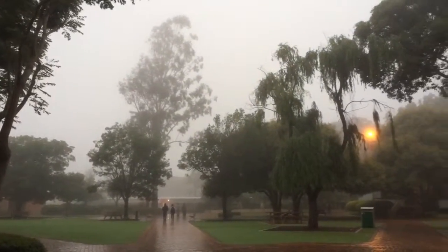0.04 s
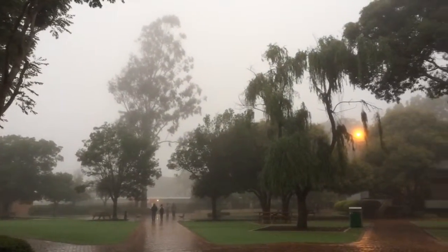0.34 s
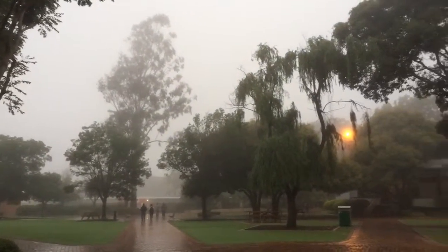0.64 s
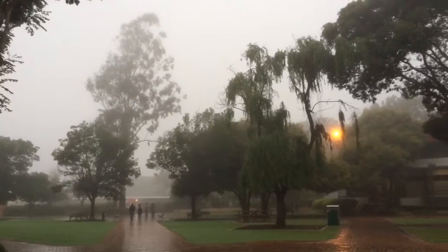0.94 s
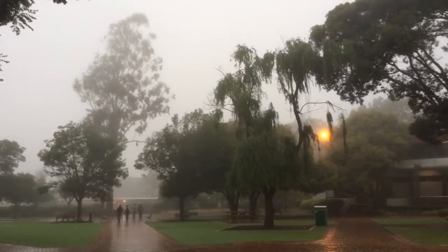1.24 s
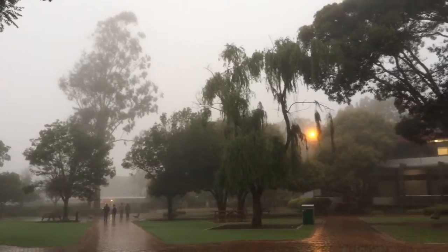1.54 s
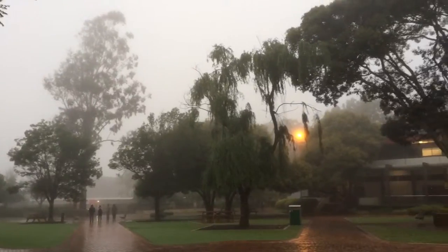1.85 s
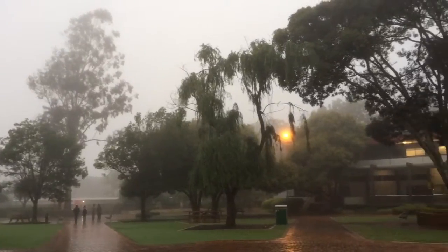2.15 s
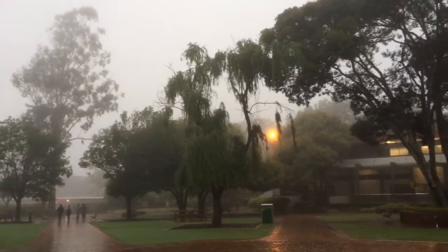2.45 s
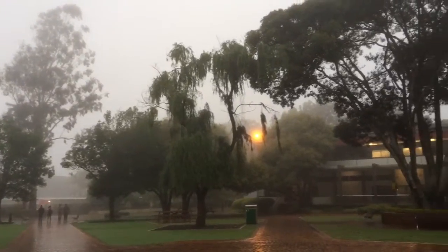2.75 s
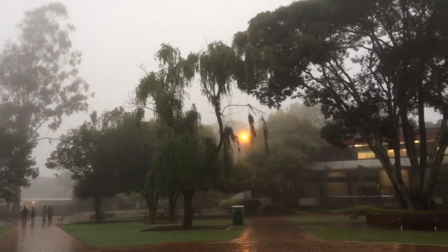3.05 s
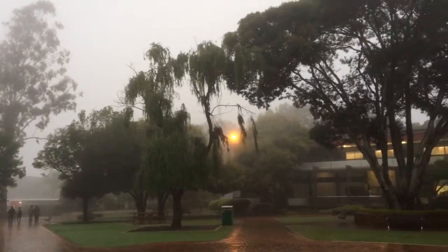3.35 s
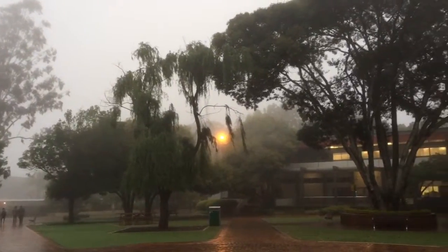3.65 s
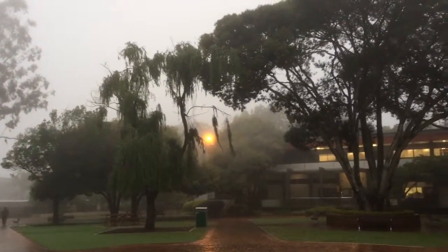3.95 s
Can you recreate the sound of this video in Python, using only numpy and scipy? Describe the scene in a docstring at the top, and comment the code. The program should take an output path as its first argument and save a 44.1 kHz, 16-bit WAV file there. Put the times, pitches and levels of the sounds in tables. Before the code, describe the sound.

Soft steady rain hisses in a park, with close drips and faraway traffic.

```python
"""Light rain on a wet park, heard from one mono microphone standing among the leaves.
Far drops merge into a soft wash and small ones patter finely on the foliage; close by, a few drips
tick, drops ring bubbles in puddles and water splashes on wet ground. In the distance traffic rumbles,
with soft low bumps, and one engine pulls up in pitch. A low mains hum stays under it all,
and a dull boom is dying away at the start."""
import sys
import numpy as np
from scipy import signal
from scipy.fft import rfft, irfft, next_fast_len
from scipy.io import wavfile
from scipy.ndimage import uniform_filter1d, map_coordinates

SR = 44100
rng = np.random.default_rng(int(sys.argv[2]) if len(sys.argv) > 2 else 0)


def unload_wav(signal):
    """Save mono or channel-first audio to the path in sys.argv[1] as 16-bit WAV at rate SR, clipped to [-1, 1]."""
    wavfile.write(
        sys.argv[1],
        SR,
        np.round(np.clip(np.atleast_2d(signal).T, -1, 1) * 32767).astype(np.int16),
    )


N = 176400
T = np.arange(N) / SR
TOP_HZ = 15450  # upper band limit


def amp(db):
    """Decibels to gain."""
    return 10 ** (np.asarray(db) / 20)


def unit(x):
    """Scale to rms 1."""
    return x / np.sqrt(np.mean(x ** 2) + 1e-20)


def gain_at(spectrum, hz):
    """Gain at hz, read from (f/Hz, level/dB) points on a log frequency axis."""
    f, db = np.transpose(spectrum)
    return amp(np.interp(np.log(hz + 1), np.log(f + 1), db))


def curves(rows):
    """One value per sample for each column after the time."""
    times, *columns = np.transpose(rows)
    return [np.interp(T, times, column) for column in columns]


def wobble(per_s):
    """A smooth random curve with per_s knots a second."""
    knots = rng.standard_normal(int(N * per_s / SR) + 4)
    return map_coordinates(knots, [T * per_s], mode="nearest")


def fade(t, t60):
    """Exponential decay from t = 0, falling 60 dB in t60 seconds."""
    return (t >= 0) * np.exp(-np.log(1000) * np.abs(t) / t60)


def filtered(x, response):
    """Filter x by a gain given as a function of frequency."""
    size = next_fast_len(N + SR // 2)
    return irfft(rfft(x, size) * response(np.fft.rfftfreq(size, 1 / SR)), size)[:N]


def noise(spectrum):
    """Coloured noise of rms 1."""
    return unit(filtered(rng.standard_normal(N), lambda hz: gain_at(spectrum, hz)))


def far_rain(patchy_db=1.08):
    """Countless drops across the park merge into a hiss with faint drifting patches."""
    # colour of the far rain and town: f/Hz, level/dB
    spectrum = [(150, -11), (300, -0.5), (420, -2.5), (560, -4.5), (720, -5), (950, -3.5), (1360, -7),
                (1850, -8), (2200, -13), (3400, -16), (5500, -21.5), (7200, -23.5), (10000, -28),
                (13500, -33.5), (15200, -37.5)]
    # loudness of the wash: t/s, level/dB
    levels = [(0, -58.5), (.6, -59), (2.6, -59), (3.4, -58.5), (4, -57.5)]
    level_db, = curves(levels)
    frames = signal.stft(rng.standard_normal(N), nperseg=512)[2]
    patches = uniform_filter1d(rng.standard_normal(frames.shape), size=7, axis=0)  # smooth in frequency
    patches = uniform_filter1d(patches, size=12, axis=1)  # and in time
    hiss = signal.istft(frames * amp(patchy_db * unit(patches)), nperseg=512)[1][:N]
    return amp(level_db) * unit(filtered(hiss, lambda hz: gain_at(spectrum, hz)))


def leaf_patter(drops_per_s=900, level_db=-79, scatter_db=3, centre_hz=5500, spread_octaves=0.96):
    """Small drops strike the leaves around the microphone, each a tick of a few cycles."""
    when, pitch_a, pitch_b, rarity = np.hsplit(rng.random((int(drops_per_s * N / SR), 4)), 4)
    hz = np.clip(centre_hz * 2 ** (spread_octaves * (pitch_a + pitch_b - 1)), 1, TOP_HZ)
    strength = amp(-scatter_db * np.log(np.maximum(rarity, .004)))  # many faint drops, few loud ones
    age = np.arange(160)  # samples
    cycles = hz * age / SR
    ticks = strength * np.sin(2 * np.pi * cycles) * np.exp(-cycles)
    at = (when * N).astype(int) + age
    return amp(level_db) * unit(np.bincount(at.ravel(), ticks.ravel(), N)[:N])


def traffic():
    """Distant roads reach the park as a low rumble that swells and sinks."""
    # colour of the rumble: f/Hz, level/dB
    spectrum = [(20, -34), (35, -12), (55, -6), (85, -5.5), (105, -10), (128, -0.5), (155, -9.5),
                (195, -7.5), (235, -15.5), (285, -16.5), (380, -33.5), (700, -60)]
    # loudness of the rumble: t/s, level/dB
    levels = [(0, -45.5), (.3, -50.5), (.95, -54.5), (1.3, -52.5), (1.75, -50), (2.05, -55.5), (3.3, -55.5),
              (4, -53)]
    level_db, = curves(levels)
    return amp(level_db) * noise(spectrum)


def far_engine():
    """One far engine drones in and out, rising in pitch as it fires faster."""
    # course of the engine: t/s, firing rate/Hz, level/dB
    course = [(0, 55.2, -56.5), (.65, 55.95, -57), (.85, 56, -83), (1.05, 57.5, -82), (1.17, 57.93, -50),
              (1.4, 58.73, -52), (1.52, 69.4, -47), (1.7, 73, -43), (1.88, 75, -45.5), (1.95, 74.35, -61),
              (2.3, 78.5, -50), (2.5, 80.9, -74), (2.72, 82, -57.5), (4, 81.75, -60.5)]
    # overtones of the firing rate: multiple, relative level/dB
    overtones = [(2, -17.5), (3, -19)]
    firing_hz, level_db = curves(course)
    phase = 2 * np.pi * np.cumsum(firing_hz) / SR
    drone = np.sin(phase) + sum(amp(db) * np.sin(k * phase) for k, db in overtones)
    return amp(level_db + wobble(20)) * unit(drone)  # wavers by about a decibel


def mains_hum(waver_db=1.1, drift_rad=0.36):
    """A low mains hum with a few faint upper tones, slightly unsteady."""
    # tones of the hum: f/Hz, level/dB
    tones = [(100, -55.5), (200, -68), (497, -78), (699, -81.5), (894, -79)]
    out = np.zeros(N)
    for hz, db in tones:
        gain = amp(db + waver_db * wobble(3.98))
        out += gain * unit(np.sin(2 * np.pi * hz * T + drift_rad * wobble(4.86)))
    return out


def boom(start_db=-38.5, t60=0.37):
    """The tail of a dull boom dies away."""
    # colour of the boom: f/Hz, level/dB
    spectrum = [(25, -12), (60, 2), (130, 5), (200, -6), (280, 1.5), (370, -6.5), (480, -8), (900, -7.5),
                (1150, -20), (1600, -25), (2000, -19), (2800, -32), (6000, -32.5), (15000, -60)]
    return amp(start_db) * noise(spectrum) * fade(T, t60)


def bumps(half_length_s=0.013):
    """Soft low thuds in the distant rumble, a few cycles each."""
    # thuds: centre t/s, peak level/dB, f/Hz
    thuds = [(0.023, -37, 139), (0.066, -33.5, 122.6), (.639, -40, 100), (0.757, -47, 103.8),
             (1.062, -44, 99.2), (1.263, -41.5, 105.4), (2.268, -36.5, 80), (2.406, -40.5, 89.8),
             (2.692, -41.5, 96.4), (2.757, -41.5, 90.8), (3.618, -43, 104.1), (3.744, -43.5, 101.1)]
    out = np.zeros(N)
    for at, db, hz in thuds:
        tone = np.sin(2 * np.pi * (hz * T + rng.random()))
        out += amp(db) * tone * np.exp(-((T - at) / half_length_s) ** 2)
    return out


def near_drips(tick_t60=0.0026, spray_db=-7):
    """A drip close to the microphone is a sharp tick and a spray, brief or drawn out to a spatter."""
    # drips: t/s, level before colouring/dB, tick f/Hz, spray t60/s
    drips = [(0.2446, -51.5, 12400, 0.0048), (.655, -62, 11000, .03), (1.408, -61, 8060, .008),
             (1.621, -38.5, 7340, 0.0061), (1.665, -62, 11000, .02), (1.981, -61.5, 7000, .2),
             (2.266, -59, 9900, .008), (2.287, -61, 12900, .008), (2.395, -61, 12500, 0.0095),
             (2.829, -61, 10570, 0.013), (3.008, -46, 13500, 0.0063), (3.154, -61, 7490, .02),
             (3.234, -60, 13000, .006), (3.966, -51, 9814, .006)]
    # colour of the spray: f/Hz, level/dB
    spray_spectrum = [(500, -15), (3000, -2), (5000, -2), (7500, -1), (13500, -1.5)]
    # colouring of tick and spray together: f/Hz, gain/dB
    colour = [(1000, -5), (2800, 5), (4500, 2), (7500, 4), (10000, 5), (13500, -1), (14700, -1),
              (15400, -10)]
    spray = amp(spray_db) * noise(spray_spectrum)
    out = np.zeros(N)
    for at, db, hz, spray_t60 in drips:
        t = T - at
        tick = np.sin(2 * np.pi * hz * t) * fade(t, tick_t60)
        out += amp(db) * (tick + spray * fade(t, spray_t60))
    return filtered(out, lambda hz: gain_at(colour, hz))


def puddle_plinks(t60=0.038, flutter_per_s=1700):
    """A drop in a puddle rings a tiny bubble; an unsteady one is more a fizz than a note."""
    # bubbles: t/s, peak level/dB, f/Hz, phase flutter/rad
    bubbles = [(.549, -62, 5470, 0.98), (1.842, -60.5, 4930, .9), (2.709, -64.5, 7000, 1.2),
               (3.585, -54, 3620, 0.34)]
    flutter = wobble(flutter_per_s)
    out = np.zeros(N)
    for at, db, hz, flutter_rad in bubbles:
        t = T - at
        out += amp(db) * np.sin(2 * np.pi * hz * t + flutter_rad * flutter) * fade(t, t60)
    return out


def ground_splashes():
    """Water lands on wet ground nearby in short swells of fizz, some duller and some brighter."""
    # splashes: centre t/s, level/dB, half length/s, tilt/(dB per octave)
    splashes = [(2.858, -65.5, 0.045, -4), (3.375, -69, 0.042, -3), (3.5864, -55, 0.0065, 0),
                (3.626, -62, 0.0043, 2), (3.641, -62, 0.012, 1), (3.622, -66, 0.04, 0),
                (3.952, -71, 0.095, -2)]
    # colour of the fizz before tilting: f/Hz, level/dB
    spectrum = [(1200, -27), (2400, -1), (3600, -1), (4500, 0), (6400, -2), (7600, -13), (14000, -26)]
    out = np.zeros(N)
    for at, level_db, half_length_s, tilt in splashes:
        fizz = noise([(hz, db + tilt * np.log2(hz)) for hz, db in spectrum])
        out += amp(level_db) * fizz * np.exp(-2 * ((T - at) / half_length_s) ** 2)
    return out


def scene():
    """Rain near and far over the low sounds of the town, at one microphone."""
    rain = far_rain() + leaf_patter() + near_drips() + puddle_plinks() + ground_splashes()
    town = traffic() + far_engine() + bumps() + mains_hum() + boom()
    return (rain + town)[None]


def record(dry):
    """The recorder keeps nothing above its band limit."""
    return np.array([filtered(x, lambda hz: hz < TOP_HZ) for x in dry])


dry = scene()
out = record(dry)
unload_wav(out)
```